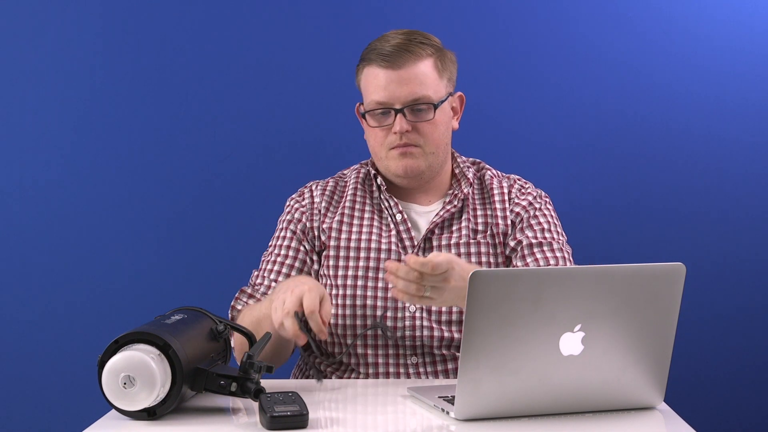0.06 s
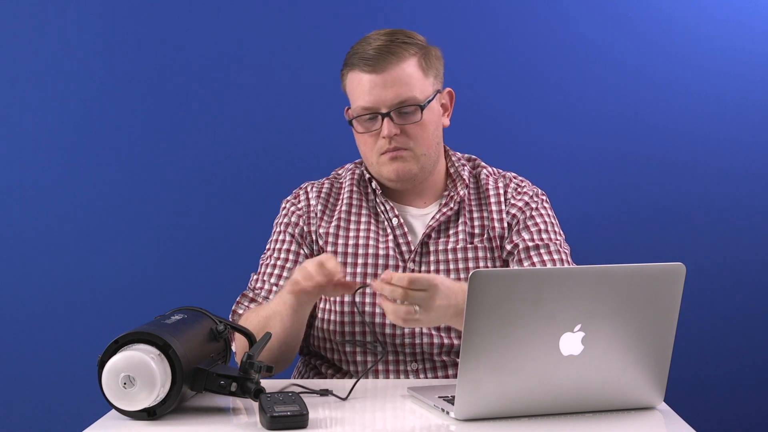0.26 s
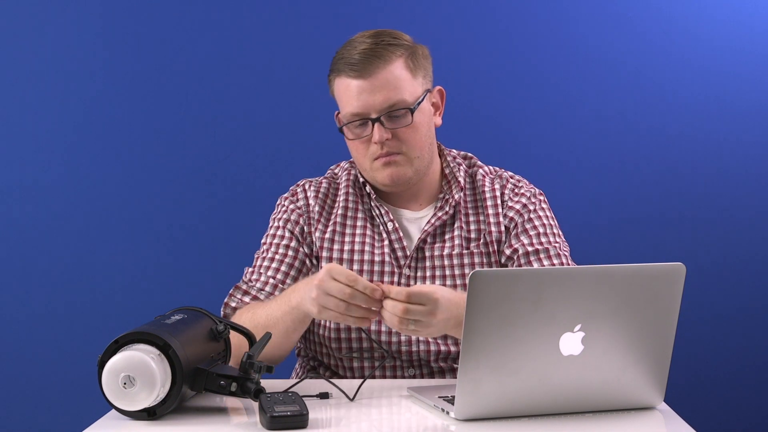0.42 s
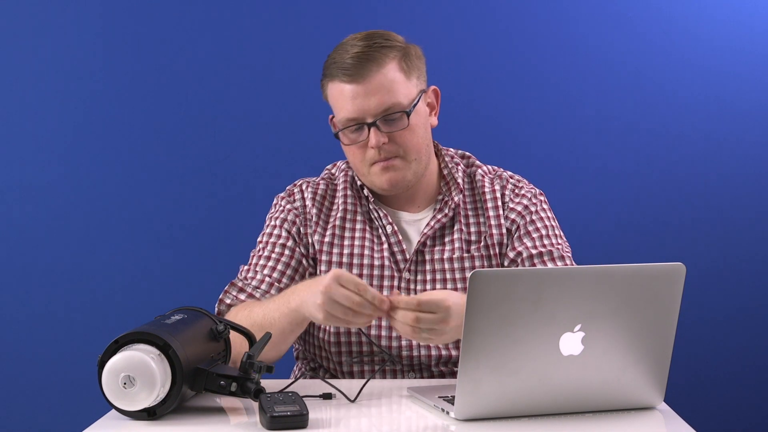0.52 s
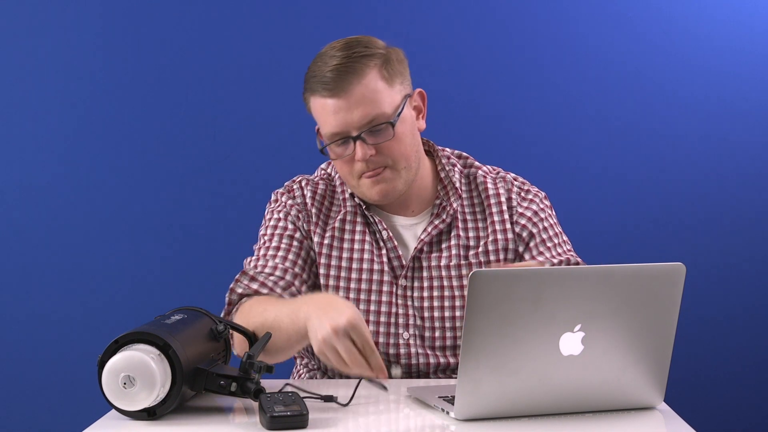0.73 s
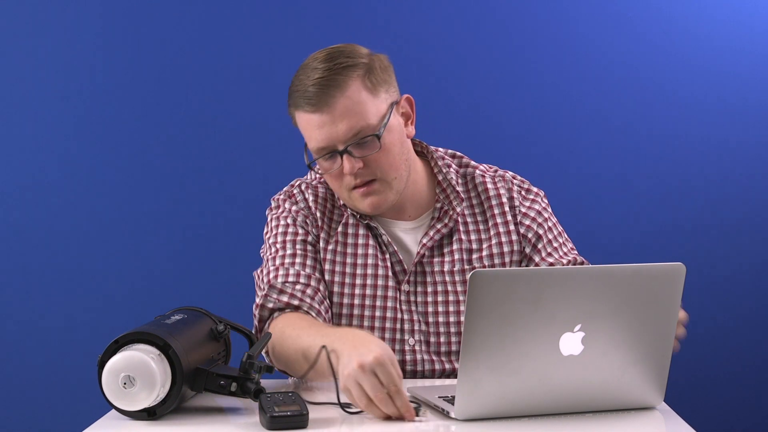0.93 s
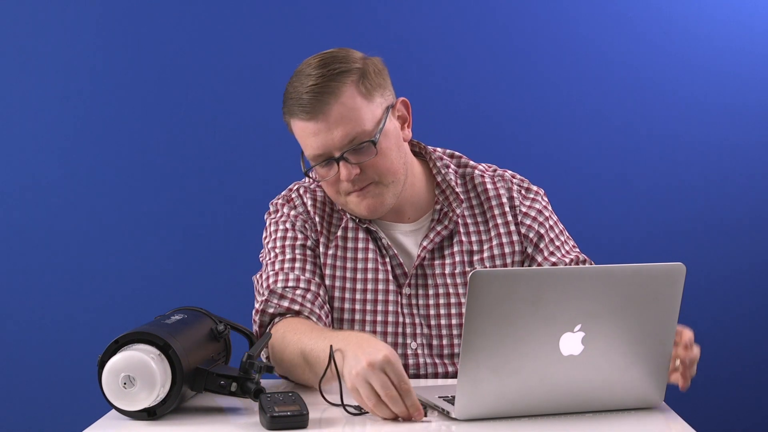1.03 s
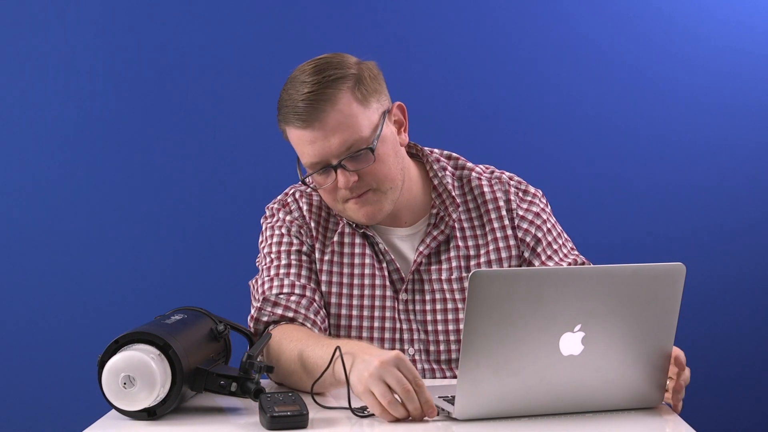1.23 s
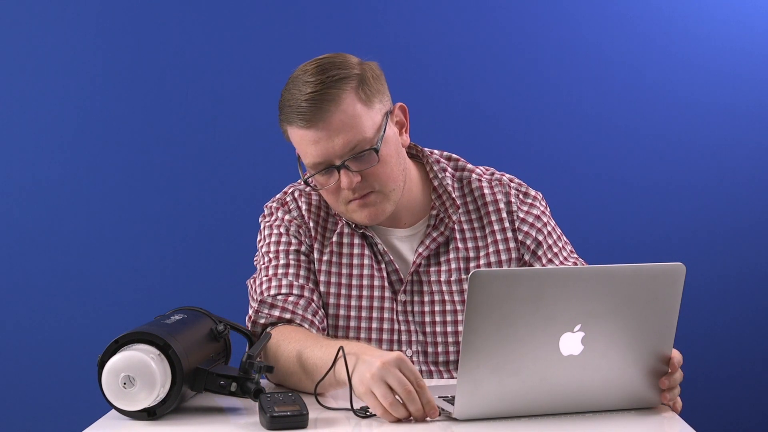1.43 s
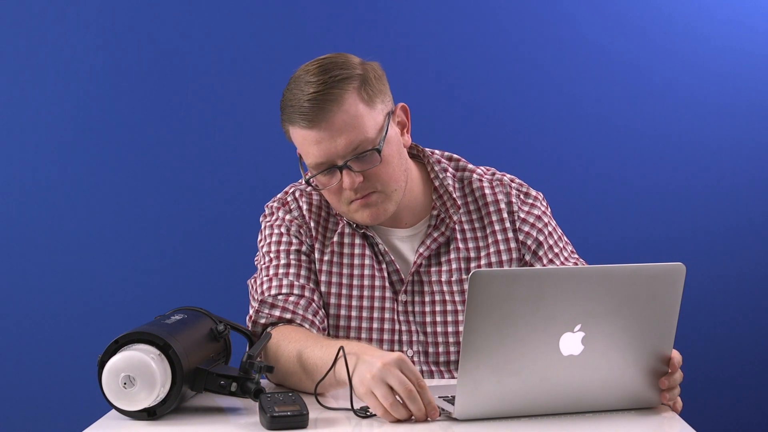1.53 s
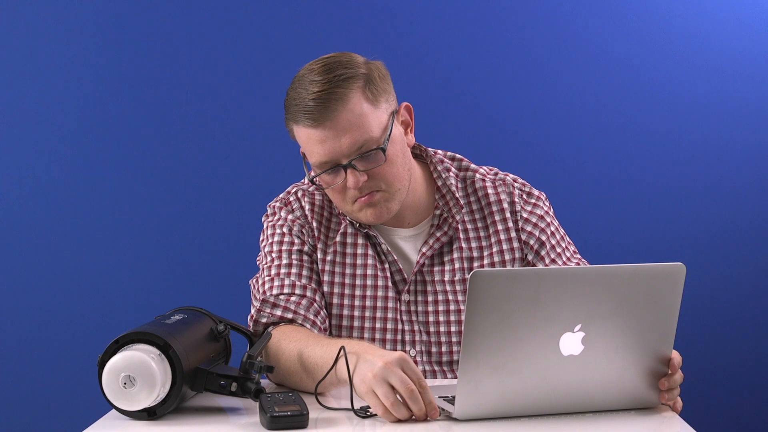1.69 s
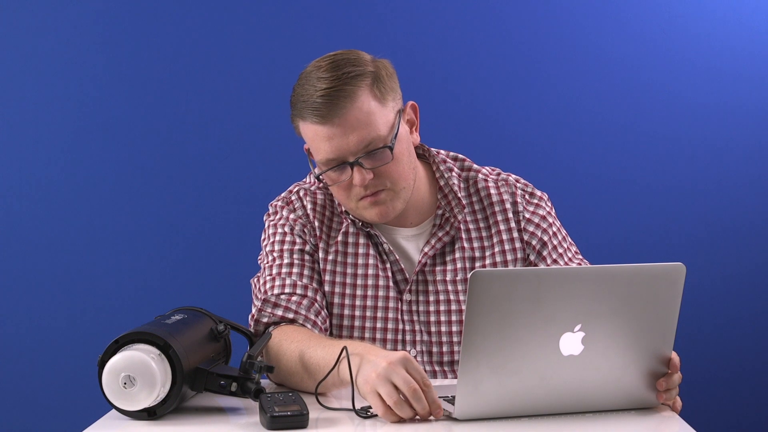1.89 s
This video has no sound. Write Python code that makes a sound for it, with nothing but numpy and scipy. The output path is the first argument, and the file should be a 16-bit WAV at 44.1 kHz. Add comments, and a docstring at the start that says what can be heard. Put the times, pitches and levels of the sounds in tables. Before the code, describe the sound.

A plastic cable plug clatters on a desk in a dense, bright burst from 0.24 to 0.41 seconds, its loudest hit slightly overloaded. After a faint touch at 0.74, sharp taps come around 0.89 and 0.97 with a sleeve rustle. Quiet scrapes against a laptop port at 1.36 lead to a small metallic snap at 1.82. Low ventilation rumble, short small-room reverberation, close mono microphone.

```python
"""Low ventilation rumble and a faint rustle of sleeves come first, then a plastic cable plug clatters onto a desk.
It is picked up with two sharp taps, finds a laptop's port and snaps in. Each contact is a short filtered click
plus fading tones: the ringing of the plug and the desk, or of the port's metal shell.
The desk top mirrors each contact about 2 ms later and a small room answers. Rumble and rustle are filtered noise."""
import sys
import numpy as np
from scipy import signal
from scipy.fft import rfft, irfft, next_fast_len
from scipy.io import wavfile

SR = 44100
rng = np.random.default_rng(int(sys.argv[2]) if len(sys.argv) > 2 else 0)


def master_out(mix):
    """Clip the mix to full scale and print it as 16-bit PCM to the path in sys.argv[1]."""
    frames = np.transpose(np.atleast_2d(mix))
    ceiling = np.clip(frames, -1, 1)
    pcm = np.round(ceiling * 32767).astype(np.int16)
    wavfile.write(sys.argv[1], SR, pcm)


N = 85995  # length in samples

# Colour of the ventilation noise, before its overall level is set: pitch_hz, relative_level_db
AIR_COLOUR = [(20, -13), (45, 0.5), (60, -7), (125, 1), (215, -1), (260, -5), (320, -5.5), (480, -11.5),
              (690, -8), (900, -14.5), (1500, -22), (3000, -24.5), (5000, -29), (9000, -36), (16000, -33.5)]
# Colour of the cloth noise, before its level is set: pitch_hz, relative_level_db
SLEEVE_COLOUR = [(500, -6), (1500, -5), (3500, -2), (6000, -10.5), (10000, -19), (16000, -22.5)]
# How loud the sleeves are over time: time_s, level_db
RUSTLE_LEVELS = [(0, -60.5), (.2, -61), (.55, -58.5), (.68, -60.5), (0.802, -57), (.94, -46),
                 (1.148, -59.5), (1.499, -70), (1.95, -82)]
# Plug and hand against the desk: start_s, click_db, brightness_hz, hard_tick_db,
# strongest_plug_ring_hz, desk_knock_db, strongest_desk_ring_hz
DESK_TAPS = [(0.236, 3, 4670, -35, 3860, -14, 720), (0.2567, -11.5, 2900, -25.5, 2300, -9.5, 900),
             (0.2774, 16.5, 6770, -1.5, 4260, 2, 734), (0.29, -0.5, 7000, -18, 3900, -7, 304),
             (0.3225, -10, 6500, -22, 5160, -14, 800), (0.3326, 10, 4700, -11.5, 3900, 4, 1260),
             (0.3371, 7.5, 5400, -10, 2274, 1.5, 540), (0.353, 3.5, 5400, -20, 4450, 0, 351),
             (0.4092, -6.5, 4440, -61, 3700, -17, 370), (0.7390, -28.5, 2105, -42, 1990, -28, 790),
             (0.8832, -1, 6300, -21, 3830, -14.5, 1190), (0.8953, -11, 4000, -33, 2800, -15.5, 406),
             (0.9702, 2.5, 7400, -12, 5200, -7.5, 610), (0.9820, -7, 7100, -20, 3840, -11, 191),
             (1.0620, -47, 3000, -50, 2300, -26, 215), (1.1890, -31, 1560, -53, 1970, -19.5, 694),
             (1.5930, -57, 1394, -56, 1970, -25.5, 680)]
# Plug against the port: start_s, click_db, brightness_hz, hard_tick_db, shell_ring_db
PORT_CONTACTS = [(1.3600, -18, 3430, -32.5, -25.5), (1.3721, -20, 4010, -33.5, -28),
                 (1.5560, -32.5, 4350, -37, -38), (1.8213, -16, 3370, -27, -14.5),
                 (1.8232, -18, 3420, -20.5, -16), (1.8325, -36, 4000, -36, -21),
                 (1.9400, -38, 4040, -46, -32.5)]
# Tones of the plug, the desk and the port's metal shell: pitch_hz, relative_level_db, time_to_fade_60_db_s
PLUG_MODES = [(1839, -5, 0.0061), (2300, -3, 0.0094), (2860, -0.5, .012), (3506, 3, 0.0071),
              (3910, -3.5, 0.017), (4486, 3.5, 0.012), (5094, -3.5, 0.02), (6270, -1, 0.01),
              (7940, -8.5, 0.0067)]
DESK_MODES = [(182, -1, .08), (307.3, -2, .06), (337, -3, 0.097), (400, -6.5, 0.05), (471, -12.5, .06),
              (570, -4.5, 0.061), (589, -3.5, .04), (675.3, 1.5, .06), (764, -5, 0.0533), (855, -5, .05),
              (1003, -5, 0.048), (1282, -0.5, 0.036), (1690, -3, .04), (2100, 3, 0.076)]
SHELL_MODES = [(1785, -5.5, 0.034), (2164, -12.5, 0.022), (3060, -5.5, 0.071), (3500, 5.5, 0.033),
               (3638, 4, 0.033), (3580, -21, .07), (4880, -2.5, 0.023), (8700, -15.5, 0.046),
               (9600, -22, 0.055), (10200, -15, .05)]
# Colours of the plug's click and of its metal tip's tick: pitch_hz, relative_level_db
CLICK_COLOUR = [(60, -49), (200, -36.5), (420, -21), (600, -19), (1000, -9.5), (1700, -4.5), (2800, -1.5),
                (4300, 1.5), (6500, -0.5), (10000, -6), (16000, -8)]
TICK_COLOUR = [(200, -54), (1000, -34), (4000, -6), (7500, 3), (10000, -3.5), (12000, -1.5), (16000, -7.5)]
# Colour of the room's answer: pitch_hz, relative_level_db
ROOM_COLOUR = [(100, -4.5), (300, 4.5), (700, 0), (1500, 2), (4000, -5), (8000, -4), (16000, -6)]
# How long the room's answer lasts: pitch_hz, time_to_fade_60_db_s
ROOM_FADE = [(150, 0.44), (600, .32), (2000, 0.25), (4000, 0.23), (8000, 0.2), (16000, 0.218)]

AIR_DB = -50
PLUG_RING_DB = -6  # compared with the plug's click
PORT_RING_HZ = 2311  # the plug's strongest ring at the port
BELOW_DB_PER_OCTAVE, ABOVE_DB_PER_OCTAVE = 20.5, 7.5  # tones away from the strongest are weaker
MIRROR_S, MIRROR_DB = 0.0021, -7  # reflection in the desk top
SCATTER_DB, SCATTER_T60_S = -4, 0.032  # reflections off things on the desk
ROOM_DELAY_S, ROOM_BUILD_S = 0.004, 0.0026
PLUG_WET_DB, DESK_WET_DB, PORT_WET_DB = 0, -3, 1  # room tail of each source
FULL_SCALE = 0.94  # largest wave height before clipping
TOP_HZ = 15900


def undb(db):
    """Turn decibels into a multiplier."""
    return 10 ** (np.asarray(db) / 20)


def unit(x):
    """Scale a sound to an energy of one."""
    return x / np.sqrt(np.sum(x ** 2))


def along(hz, points):
    """Read between (pitch_hz, value) points, with pitch spaced in octaves."""
    point_hz, values = np.array(points, float).T
    return np.interp(np.log(np.maximum(hz, 1)), np.log(point_hz), values)


def colour(x, points):
    """Filter with the gain of (pitch_hz, level_db) points, never sounding before its input."""
    size = next_fast_len(2 * len(x), True) // 2 * 2
    gain = undb(along(np.fft.rfftfreq(size, 1 / SR), points))
    # Folding the cepstrum (the transform of the log gain) makes the filter act only forward in time.
    cepstrum = irfft(np.log(gain))
    cepstrum[1:size // 2] *= 2
    cepstrum[size // 2 + 1:] = 0
    causal_filter = np.exp(rfft(cepstrum))
    return irfft(rfft(x, size) * causal_filter)[:len(x)]


def cut(x, hz, kind, order):
    """Remove the treble ("low" pass) or the bass ("high" pass)."""
    sections = signal.butter(order, min(hz, TOP_HZ), kind, fs=SR, output="sos")
    return signal.sosfilt(sections, x)


def fade(t60):
    """Half a second of smooth fading that drops 60 dB in t60 seconds."""
    t = np.arange(SR // 2) / SR
    return np.exp(-np.log(1000) * t / t60)


def add(out, start, x):
    """Mix x into out from a start time in seconds."""
    i = int(start * SR)
    out[i:i + len(x)] += x[:max(N - i, 0)]


def ventilation():
    """Moving air makes a steady low rumble with some hiss."""
    air = colour(rng.standard_normal(N), AIR_COLOUR)
    return undb(AIR_DB) * air / air.std()


def sleeves():
    """Cloth brushes as the arms move, making noise that swells and fades."""
    cloth = colour(rng.standard_normal(N), SLEEVE_COLOUR)
    times, levels_db = np.array(RUSTLE_LEVELS).T
    level_db = np.interp(np.arange(N) / SR, times, levels_db)
    return undb(level_db) * cloth / cloth.std()


def ring(modes, strongest_hz=None):
    """A struck object rings at its own pitches; the place of the blow favours those near one pitch."""
    t = np.arange(SR // 2) / SR
    out = 0
    for hz, db, t60 in modes:
        octaves = np.log2(hz / strongest_hz) if strongest_hz else 0
        weaker_db = max(-BELOW_DB_PER_OCTAVE * octaves, ABOVE_DB_PER_OCTAVE * octaves)
        tone = np.sin(2 * np.pi * (hz * t + rng.random()))  # random starting phase
        out = out + undb(db - weaker_db) * unit(tone * fade(t60))
    bass_limit_hz = (strongest_hz or modes[0][0]) / 2
    return unit(cut(out, bass_limit_hz, "high", order=3))


def plug_click(click_db, bright_hz, tick_db, ring_hz):
    """The plug clicks and rings briefly, duller for a softer contact, and its metal tip ticks."""
    impulse = signal.unit_impulse(SR // 2)
    click = unit(colour(impulse, CLICK_COLOUR))
    body = click + undb(PLUG_RING_DB) * ring(PLUG_MODES, ring_hz)
    body = unit(cut(body, bright_hz, "low", order=5))
    tick = unit(colour(impulse, TICK_COLOUR))
    return undb(click_db) * body + undb(tick_db) * tick


def room_tail():
    """The room's answer builds up quickly, then each band of noise fades at its own rate."""
    t = np.arange(SR // 2) / SR
    hz = np.fft.rfftfreq(len(t), 1 / SR)
    noise = rfft(rng.standard_normal(len(t)))
    build = 1 - np.exp(-np.maximum(t - ROOM_DELAY_S, 0) / ROOM_BUILD_S)
    edges = np.geomspace(80, SR / 2, 12)
    tail = 0
    for lo, hi in zip(edges, edges[1:]):
        band = irfft(noise * (hz >= lo) * (hz < hi), len(t))
        t60 = along(np.sqrt(lo * hi), ROOM_FADE)
        share = np.sqrt((hi - lo) / (SR / 2))  # wider bands hold more energy
        tail = tail + share * unit(band * build * fade(t60))
    return colour(tail, ROOM_COLOUR)


def room(x, wet_db):
    """Direct sound, desk-top mirror, near scatter and room tail; reflections are drawn anew each time."""
    scatter = unit(rng.standard_normal(SR // 2) * fade(SCATTER_T60_S))
    response = undb(wet_db) * room_tail() + undb(SCATTER_DB) * scatter
    response[0] += 1  # direct sound
    response[int(MIRROR_S * SR)] += undb(MIRROR_DB)
    return signal.fftconvolve(x, response)[:SR // 2]


def desk_taps():
    """Each blow clicks the plug and knocks the desk into ringing."""
    out = np.zeros(N)
    for start, click_db, bright_hz, tick_db, ring_hz, knock_db, knock_hz in DESK_TAPS:
        click = plug_click(click_db, bright_hz, tick_db, ring_hz)
        knock = undb(knock_db) * ring(DESK_MODES, knock_hz)
        add(out, start, room(click, PLUG_WET_DB))
        add(out, start, room(knock, DESK_WET_DB))
    return out


def port_clicks():
    """The plug nudges the port and snaps in, ringing the metal shell."""
    out = np.zeros(N)
    for start, click_db, bright_hz, tick_db, shell_db in PORT_CONTACTS:
        click = plug_click(click_db, bright_hz, tick_db, PORT_RING_HZ)
        shell = undb(shell_db) * ring(SHELL_MODES)
        add(out, start, room(click + shell, PORT_WET_DB))
    return out


def scene():
    """Mix the rumble, rustle, desk taps and port clicks into one channel."""
    mix = ventilation() + sleeves() + desk_taps() + port_clicks()
    return mix[None]


def record(dry):
    """The recorder flattens peaks that overload it and cuts the highest treble."""
    clipped = np.clip(dry, -FULL_SCALE, FULL_SCALE)
    treble_cut = signal.ellip(10, 0.05, 60, TOP_HZ, fs=SR, output="sos")
    return signal.sosfiltfilt(treble_cut, clipped)


dry = scene()
out = record(dry)
master_out(out)
```